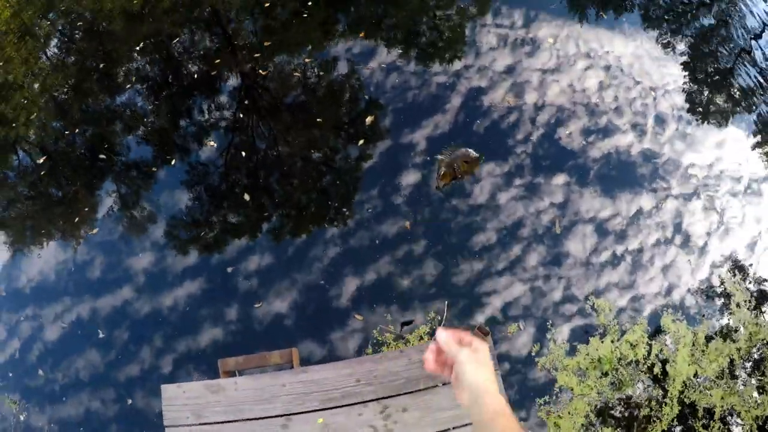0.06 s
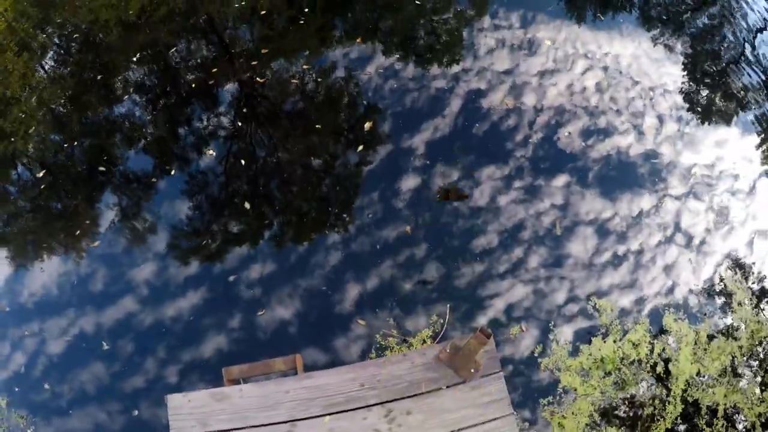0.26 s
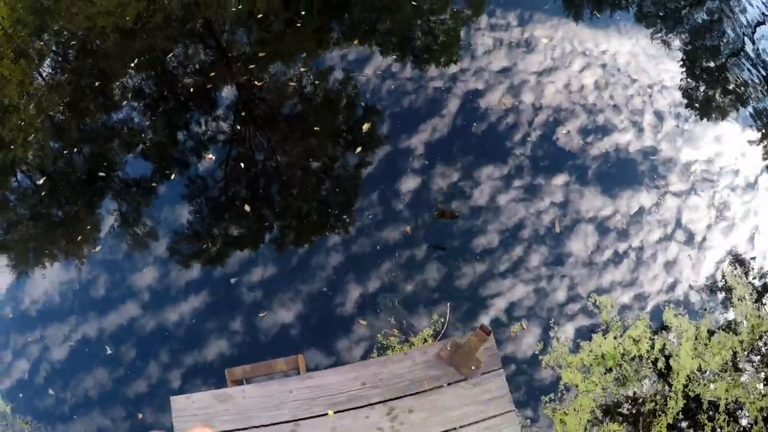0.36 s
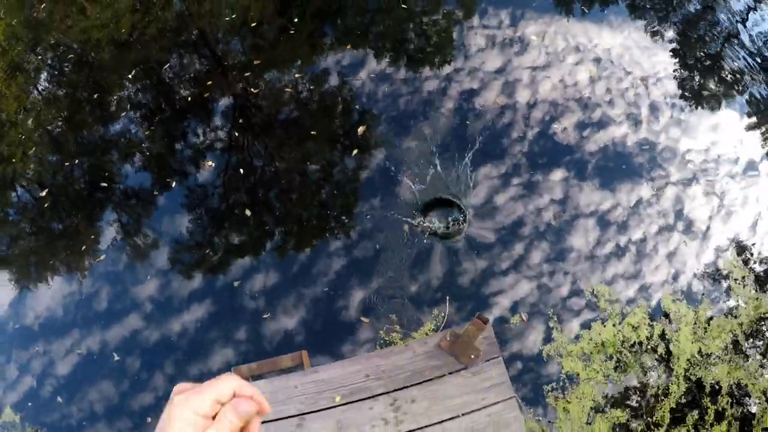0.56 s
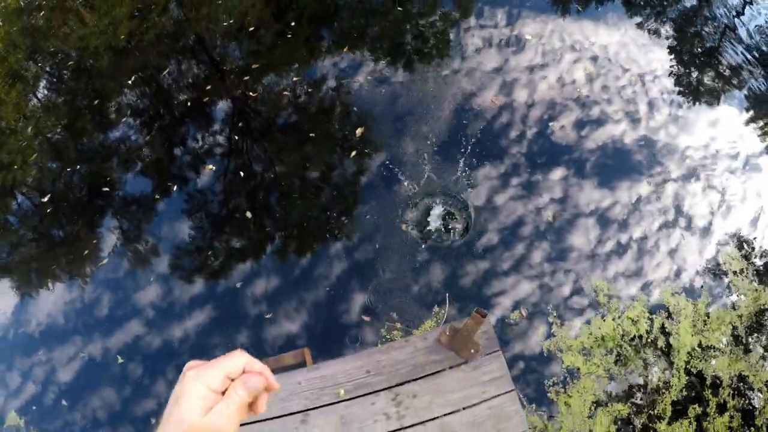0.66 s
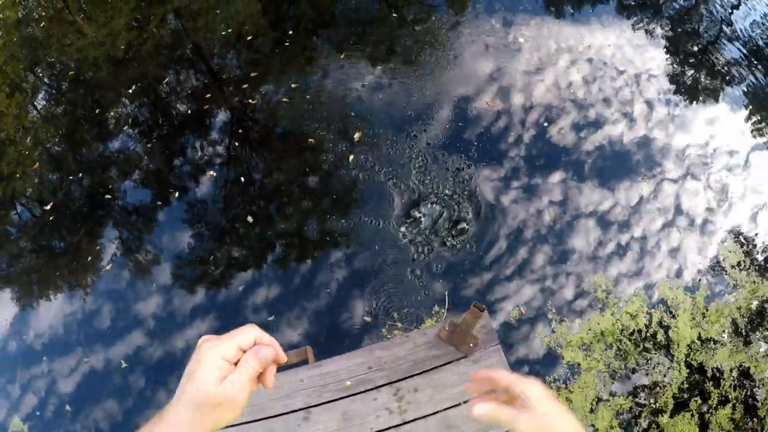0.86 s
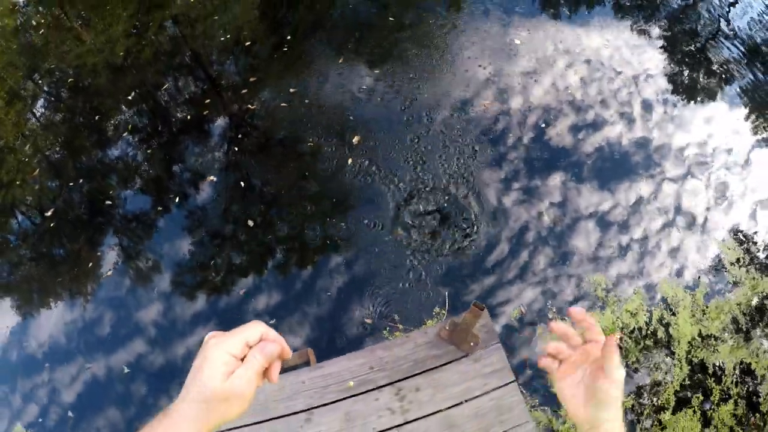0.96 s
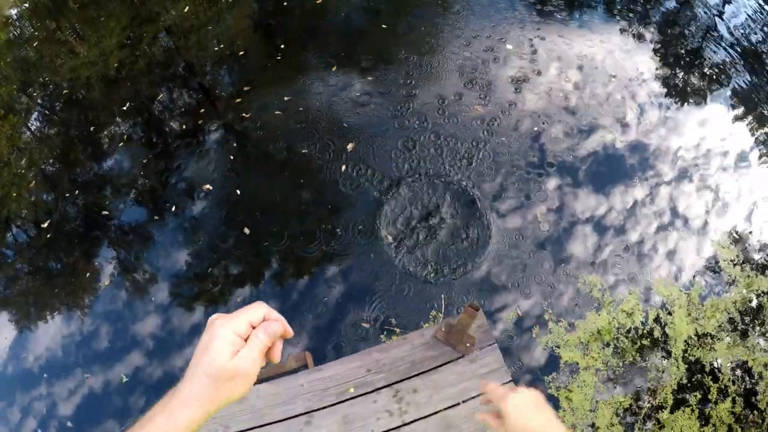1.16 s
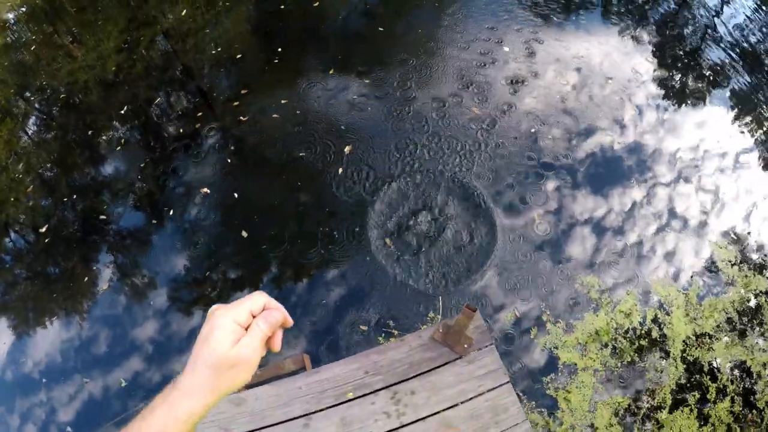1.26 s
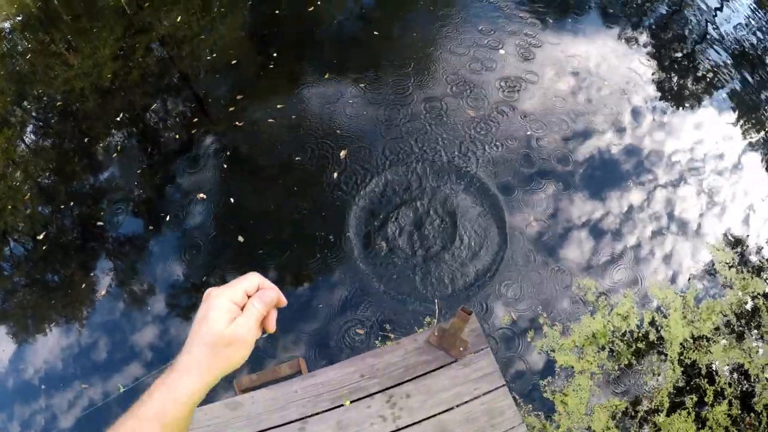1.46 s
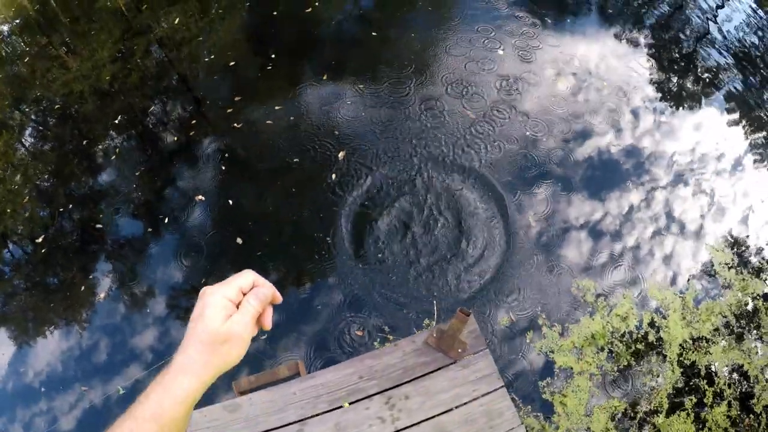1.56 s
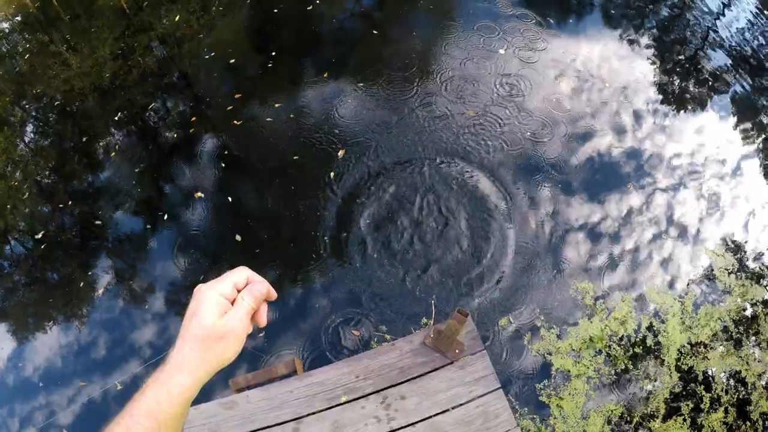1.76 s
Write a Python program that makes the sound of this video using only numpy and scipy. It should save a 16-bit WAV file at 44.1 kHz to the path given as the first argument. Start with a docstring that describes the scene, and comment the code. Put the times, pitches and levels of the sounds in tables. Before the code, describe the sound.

A small object splashes into still water beside a wooden dock with a sharp smack. A plop follows, then drops patter back with little bubbles and a few pops, over faint insects and a low outdoor rumble.

```python
"""A splash beside a dock

A small object is tossed into still water beside a wooden dock and lands with a sharp smack.
The hole it makes in the water closes with a plop, then the thrown water rains back as splats
and rising notes from ringing bubbles of trapped air. Insects trill with their wings on the bank,
over a low outdoor rumble and a faint far hum."""
import sys
import numpy as np
from scipy import signal
from scipy.fft import rfft, irfft
from scipy.io import wavfile

SR = 44100
rng = np.random.default_rng(int(sys.argv[2]) if len(sys.argv) > 2 else 0)


def master(y):
    """Save y as 16-bit WAV."""
    cut = np.clip(np.atleast_2d(y).T, -1, 1)
    pcm = np.round(cut * 32767)  # scale
    wavfile.write(sys.argv[1], SR, pcm.astype(np.int16))


N = 79380
TIME = np.arange(N) / SR


def from_db(db):
    """Turn decibels into a number to multiply a sound by."""
    return 10 ** (np.asarray(db) / 20)


def rms_one(x):
    """Scale a signal so its average strength (rms) is 1."""
    return x / np.sqrt(np.mean(x ** 2) + 1e-20)


def in_time(rows):
    """Join (time_s, value) points with straight lines."""
    return np.interp(TIME, *np.transpose(rows))


def coloured(x, points):
    """Shape a sound's lows and highs with (pitch_hz, level_db) points; strength 1."""
    hz, db = np.transpose(points)
    bins = np.maximum(np.arange(N // 2 + 1) * SR / N, 1)
    gain = from_db(np.interp(np.log(bins), np.log(hz), db))
    return rms_one(irfft(rfft(x) * gain, N))


def drift(hz):
    """A random wobble, mostly slower than hz; strength 1."""
    bins = np.arange(N // 2 + 1) * SR / N
    return rms_one(irfft(rfft(rng.standard_normal(N)) / (1 + (bins / hz) ** 2), N))


def decay(t, fade_s):
    """A fade that falls 60 dB in fade_s seconds."""
    return np.exp(-np.log(1000) * t / fade_s)


def cut_lows(x, below_hz, order=2):
    """Turn down the low notes; a higher order cuts more steeply."""
    return signal.lfilter(*signal.butter(order, below_hz, "high", fs=SR), x)


def add(out, start_s, sound):
    """Mix a sound in at its start time."""
    i = round(start_s * SR)
    out[i:i + len(sound)] += sound[:N - i]


def ring(hz, fade_s, rise=0):
    """A fading tone whose pitch starts to climb at rise octaves per second."""
    t = TIME[:int(fade_s * SR) + 2]
    pitch = hz * (1 + np.log(2) * rise * t)
    return np.sin(2 * np.pi * (np.cumsum(pitch) - hz) / SR) * decay(t, fade_s)


def burst(noise, hz, width_hz, fade_s):
    """A fading puff of noise, strongest around hz."""
    b, a = signal.iirpeak(hz, hz / width_hz, fs=SR)
    fall = decay(TIME[:len(noise)], fade_s)
    puff = signal.lfilter(b, a, signal.lfilter(b, a, noise)) * fall
    return puff * np.linalg.norm(fall) / np.linalg.norm(puff)


# Tone of the open air and a far insect chorus: pitch_hz, relative_db
AIR_COLOUR = [(200, -8.5), (300, -6), (800, -12.5), (2000, -18), (4000, -22), (5400, -14), (5900, -19.5),
              (6350, -13), (6700, -18.5), (7800, -10.5), (8400, -26), (14000, -20.5), (15500, -28)]
# Tone of the low rumble: pitch_hz, relative_db
RUMBLE_COLOUR = [(10, -1), (25, -6), (45, -14), (80, -14), (110, -21.5), (180, -28.5), (260, -33),
                 (500, -57.5)]
# Tones in the hum, before it swells: pitch_multiple, level_db
HUM_TONES = [(1, -67), (2, -64), (3, -89)]
# How the hum swells and sinks: time_s, change_db
HUM_SWELL = [(0, -1), (.3, 2), (.85, -5.5), (1.25, 6.5), (1.6, -8)]


def outdoors(air_db=-63.5, rumble_db=-47.5, hum_hz=75.55, waver_db=2.5):
    """Soft airy hiss, a low rumble and a wavering far hum."""
    air = from_db(air_db) * coloured(rng.standard_normal(N), AIR_COLOUR)
    rumble = from_db(rumble_db) * coloured(rng.standard_normal(N), RUMBLE_COLOUR)
    hum = sum(from_db(db + waver_db * drift(4)) * np.sin(2 * np.pi * multiple * hum_hz * TIME)
              for multiple, db in HUM_TONES)
    return air + rumble + hum * from_db(in_time(HUM_SWELL))


# One insect a row: pitch_hz, first_strokes_per_s, later_strokes_per_s, first_db, later_db,
# pitch_drop_hz, roughness (0 to 1)
INSECTS = [(5550, 69, 58, -66, -73, 380, 0), (6250, 23, 15, -85, -84, 200, .2),
           (7670, 21, 21, -70.5, -94, 140, 0.25), (8000, 33, 26, -77.5, -82, 40, 0.6)]
# Most trills slow and soften, moving from "first" to "later": time_s, share_of_change (0 to 1)
INSECT_CHANGE = [(.4, 0.018), (1.1, 0.96)]


def insects(skip_chance=.03, wander_hz=22, waver_db=.5):
    """Each wing stroke is a short tone that sags in pitch; now and then one is skipped."""
    out, change = np.zeros(N), in_time(INSECT_CHANGE)
    for hz, first_rate, later_rate, first_db, later_db, drop_hz, roughness in INSECTS:
        rate = first_rate + change * (later_rate - first_rate)
        stroke, progress = np.divmod(np.cumsum(rate) / SR, 1)
        played = rng.random(N)[stroke.astype(int)] > skip_chance
        pitch = hz + wander_hz * drift(43) - drop_hz * (progress - .5)
        phase = 2 * np.pi * np.cumsum(pitch) / SR
        tone = np.sin(phase) + roughness * drift(81) * np.cos(phase)
        pulse = np.sin(np.pi * progress) ** 4
        db = first_db + change * (later_db - first_db) + waver_db * drift(5.4)
        out += from_db(db) * rms_one(played * tone * pulse)
    return out


def bank_echo(sound, level_db=-23.5, fade_s=.17, top_hz=5000):
    """The dock and the trees scatter back a faint, dull echo."""
    dull_noise = signal.lfilter(*signal.butter(1, top_hz, fs=SR), rng.standard_normal(N))
    tail = dull_noise * decay(TIME, fade_s)
    return from_db(level_db) * signal.fftconvolve(sound, tail / np.linalg.norm(tail))[:N]


def bubble(hz, fade_s, rise, attack_s=.00021):
    """A pocket of air pinches off and rings on its way up."""
    note = ring(hz, fade_s, rise)
    return note * (1 - np.exp(-TIME[:len(note)] / attack_s))


def bubble_cloud(per_s, low_hz, high_hz, cycles):
    """Many small bubbles, each with a random size, loudness and climb in pitch."""
    chance, size, strength, climb = rng.random((4, N))
    out = np.zeros(N)
    for i in np.flatnonzero(chance < per_s / SR):
        hz = low_hz * (high_hz / low_hz) ** size[i]
        fade_s = cycles / hz
        add(out, i / SR, strength[i] * bubble(hz, fade_s, rise=1.5 * climb[i] / fade_s))
    return rms_one(out)


def droplets(per_s, low_hz, high_hz, cycles, pitch_count=24, spread_db=2):
    """Tiny drops land at random, each ringing for a few cycles at one of a set of pitches."""
    sizes = from_db(spread_db * np.minimum(rng.exponential(1, N), 4)) * rng.choice([-1, 1], N)
    clicks = sizes * (rng.random(N) < per_s / SR)
    pitch_choice = rng.integers(0, pitch_count, N)
    out = np.zeros(N)
    for k, hz in enumerate(np.linspace(np.sqrt(low_hz), np.sqrt(high_hz), pitch_count) ** 2):
        ticks = signal.fftconvolve(clicks * (pitch_choice == k), ring(hz, cycles / hz))[:N]
        out += hz ** .25 * rms_one(ticks)
    return out


# How much water is in the air and falling back: time_s, level_db
SPRAY_AMOUNT = [(.403, -88), (.412, -72), (.44, -63), (.49, -64), (.51, -58), (.555, -47.5), (.585, -53.5),
                (.62, -58.5), (.66, -58.5), (.72, -59.5), (.78, -54), (.86, -56), (.93, -57), (.98, -65.5),
                (1.05, -68), (1.11, -67), (1.16, -72), (1.45, -80)]
# Tone of the drops and mist: pitch_hz, relative_db
SPRAY_COLOUR = [(300, -19), (700, -1.5), (1500, -7), (3200, 1.5), (4400, -6), (6500, 0.5), (9000, -7),
                (14500, -5.5)]


def spray(drops_db=2, mist_db=-2.5, fizz_db=-3, cluster_db=2.5):
    """Fine drops land in clusters, mist hisses, and the tiny bubbles left behind fizz."""
    ticks = droplets(per_s=1000, low_hz=1530, high_hz=13500, cycles=17)
    clusters = from_db(cluster_db * drift(70))
    drops = from_db(drops_db) * coloured(ticks * clusters, SPRAY_COLOUR)
    mist = from_db(mist_db) * coloured(rng.standard_normal(N), SPRAY_COLOUR)
    fizz = from_db(fizz_db) * bubble_cloud(per_s=330, low_hz=1000, high_hz=6000, cycles=32)
    return from_db(in_time(SPRAY_AMOUNT)) * (drops + mist + fizz)


# The hole closes, caves in, and a jet of water falls back: middle_s, spread_s, level_db
GURGLES = [(.475, 0.016, -61), (.57, 0.022, -50.5), (.86, .06, -61)]


def gurgles():
    """Short-lived bubbles crowd together whenever the water is stirred hard."""
    swell = sum(from_db(db) * np.exp(-.5 * ((TIME - middle_s) / spread_s) ** 2)
                for middle_s, spread_s, db in GURGLES)
    return swell * bubble_cloud(per_s=1400, low_hz=566, high_hz=2600, cycles=14.2)


# The last floating bubbles burst: start_s, length_s, first_hz, last_hz, level_db
POPS = [(1.072, .0065, 3300, 8000, -45.5), (1.097, 0.011, 1374, 3550, -49.5),
        (1.177, 0.0057, 2780, 7700, -51.5), (1.2805, 0.0037, 3830, 13200, -44)]


def pops(flutter=.25, flutter_hz=900):
    """A bubble's note whips upward as its skin opens; the torn skin makes it ragged."""
    out = np.zeros(N)
    for start_s, length_s, first_hz, last_hz, db in POPS:
        opening = np.linspace(0, 1, int(length_s * SR) + 2)
        phase = 2 * np.pi * np.cumsum(first_hz * (last_hz / first_hz) ** opening) / SR
        add(out, start_s, from_db(db) * np.sin(np.pi * opening ** 2) * np.sin(phase))
    return out * (1 + flutter * drift(flutter_hz))


# Trapped air ringing: start_s, first_hz, level_db, fade_s, rise_octaves_per_s
BIG_BUBBLES = [(0.4635, 2840, -45, .012, 0), (0.477, 1100, -47, .04, 15), (.515, 1810, -43, 0.031, 27),
               (.522, 360, -44, 0.028, 0), (.529, 1260, -44, 0.035, 49), (.5335, 3240, -39.5, .012, 0),
               (0.546, 1290, -32, 0.0088, -10), (.555, 590, -42, 0.02, 51), (0.5625, 1634, -29, 0.032, 5),
               (0.5626, 553, -34, 0.051, 2), (.5624, 3640, -35.5, 0.019, 4), (0.562, 2144, -29, .018, 30),
               (0.578, 1910, -37, 0.022, 0), (.592, 500, -41, 0.093, 26.5), (.605, 900, -43, 0.035, 23),
               (0.607, 1240, -48.5, 0.025, 13), (0.6273, 776, -36.5, .03, 12),
               (.653, 3000, -44.5, 0.013, 22), (0.69, 984, -37.5, 0.063, 26), (.711, 3730, -43, .008, 60),
               (0.7496, 2910, -41.5, 0.029, 36), (0.7732, 1430, -45, 0.099, 24),
               (0.7855, 1624, -39, .028, 33), (.7888, 3010, -33, 0.015, 26), (0.7958, 883, -41, 0.048, 7),
               (0.843, 1170, -35, 0.035, 72), (0.844, 602, -46.5, .055, 16.5), (.849, 1800, -36, 0.023, 38),
               (.866, 676, -48, 0.066, 0), (.866, 1110, -48.5, 0.092, 12), (.882, 2406, -43, 0.036, 13),
               (.9, 1900, -43, 0.019, 34), (0.916, 3300, -42, 0.04, 6), (.9165, 1950, -44, 0.021, 24),
               (.923, 700, -50.5, 0.12, 13), (0.9303, 1000, -43.5, 0.047, 47),
               (0.941, 1450, -46, 0.039, 33), (0.9454, 3330, -33, 0.011, 20),
               (.952, 747, -47.5, 0.094, 5.5), (.972, 670, -52.5, 0.044, 8), (.974, 1103, -46, 0.071, 9.5),
               (1.008, 1078, -46.5, 0.086, -3), (1.223, 2520, -56, 0.021, 0)]


def plops(wobble=.25, wobble_hz=260):
    """The closing hole and falling jet trap big bubbles, which wobble under the moving surface."""
    out = np.zeros(N)
    for start_s, hz, db, fade_s, rise in BIG_BUBBLES:
        add(out, start_s, from_db(db) * bubble(hz, fade_s, rise))
    return out * (1 + wobble * drift(wobble_hz))


# The smack's quick echoes, then slaps of thrown water: start_s, level_db, pitch_hz, fade_s
ECHOES_AND_SPLATS = [(0.4085, -27.5, 9100, 0.004), (0.411, -39, 3000, 0.0068), (0.4114, -23, 6500, 0.0041),
                     (0.4171, -33, 5000, 0.0095), (0.436, -48, 8000, 0.032), (0.5207, -34.5, 7500, 0.013),
                     (0.5372, -39.5, 7500, 0.015), (0.543, -44, 5000, 0.019), (0.5632, -29, 2090, 0.0083),
                     (0.5644, -35.5, 5600, 0.01), (0.572, -44, 8050, 0.039), (.579, -40.5, 4030, 0.025),
                     (.604, -40, 2980, .012), (0.6571, -41.5, 7700, 0.0099), (0.678, -53, 10500, .007),
                     (0.688, -44, 6960, 0.014), (0.699, -45, 6140, 0.018), (0.705, -45, 5500, 0.02),
                     (0.7233, -44, 8500, 0.012), (0.7491, -42.5, 5000, 0.02), (0.76, -35, 5000, 0.0087),
                     (0.7648, -43.5, 7400, 0.017), (0.7856, -44, 6000, 0.0068), (.802, -47, 11000, .008),
                     (0.8254, -42, 6850, 0.029), (0.843, -42, 7000, .01), (.8695, -44, 8500, .007),
                     (0.881, -40, 4770, 0.032), (0.8926, -39.5, 8000, 0.01), (0.9093, -39, 6500, 0.0042),
                     (0.9148, -33.5, 10300, 0.0073), (0.9192, -32.5, 7400, 0.0026),
                     (0.925, -40, 4760, 0.017), (0.931, -43, 6500, 0.015), (0.951, -43, 5500, 0.012),
                     (1.007, -50, 3500, 0.0051), (1.0674, -37, 11000, 0.0023), (1.1, -46.5, 12000, .006),
                     (1.112, -48.5, 6000, 0.0039), (1.263, -51.5, 2100, 0.045), (1.3304, -49, 5500, 0.0062)]


def echoes_and_splats(narrowness=.94):
    """Short puffs of noise: first the smack's quick echoes, then thrown water slapping the surface."""
    out = np.zeros(N)
    for start_s, db, hz, fade_s in ECHOES_AND_SPLATS:
        noise = rng.standard_normal(N // 20)
        add(out, start_s, from_db(db) * burst(noise, hz, hz / narrowness, fade_s))
    return out


# Tones of the crack as the object meets the water: pitch_hz, relative_db, fade_s
CRACK_TONES = [(1290, -7.5, 0.0058), (3300, 0.5, 0.0035), (6500, 3, 0.0015), (10600, -0.5, 0.00073),
               (13200, -1, 0.0011)]
# Tones of the water being shoved aside: pitch_hz, level_db, fade_s
THUMP_TONES = [(300, -36.5, 0.037), (384, -27, 0.014)]


def smack(start_s=.4034, crack_db=-12, echo_delay_s=.0066, echo_db=-10.5, hiss_db=-34.5):
    """The object lands: a crack that bounces off the dock, a hollow thump and a hiss."""
    out = np.zeros(N)
    for k, (hz, db, fade_s) in enumerate(CRACK_TONES):
        add(out, start_s, (-1) ** k * from_db(crack_db + db) * ring(hz, fade_s))
    out = cut_lows(out, below_hz=510)
    dock_echo = from_db(echo_db) * cut_lows(out, below_hz=2000, order=1)
    add(out, echo_delay_s, dock_echo)
    for hz, db, fade_s in THUMP_TONES:
        thump = from_db(db) * cut_lows(ring(hz, fade_s), below_hz=252)
        add(out, start_s + .001, thump)
    # A crown of water rises and hisses as it tears loose.
    hiss = burst(rng.standard_normal(N // 10), hz=5500, width_hz=14700, fade_s=.075)
    add(out, start_s, from_db(hiss_db) * hiss)
    return out


def scene():
    """The splash and its echo over the waterside background, in one channel."""
    background = outdoors() + insects()
    splash = spray() + smack() + echoes_and_splats() + plops() + gurgles() + pops()
    return (background + bank_echo(splash) + splash)[None]


def record(dry, top_hz=15300):
    """Cut away the very highest treble."""
    return signal.sosfilt(signal.ellip(10, .1, 80, top_hz, fs=SR, output="sos"), dry)


dry = scene()
out = record(dry)
master(out)
```